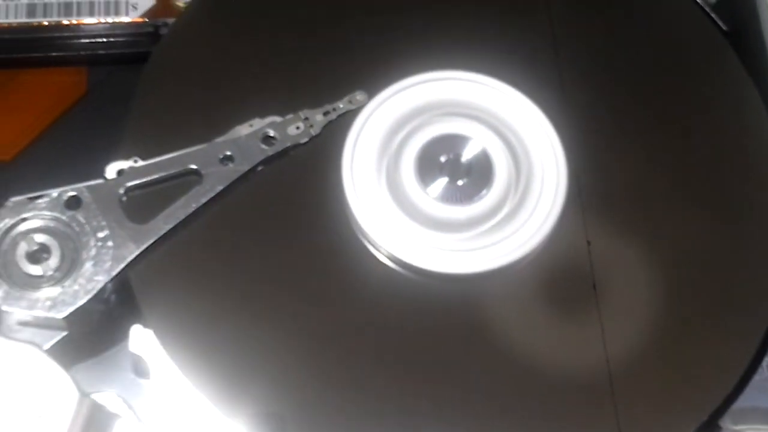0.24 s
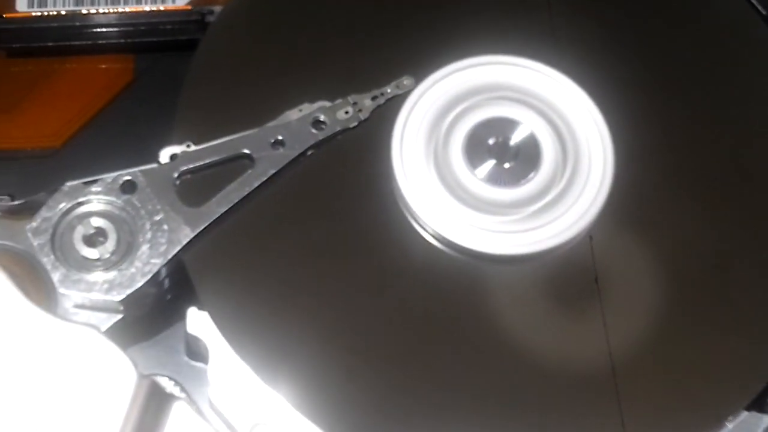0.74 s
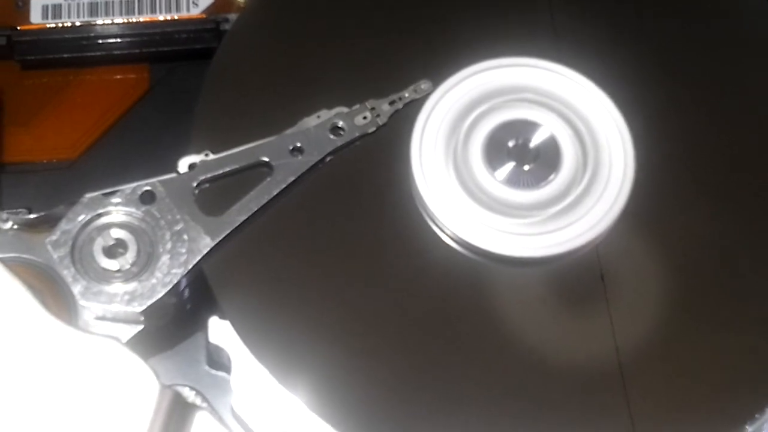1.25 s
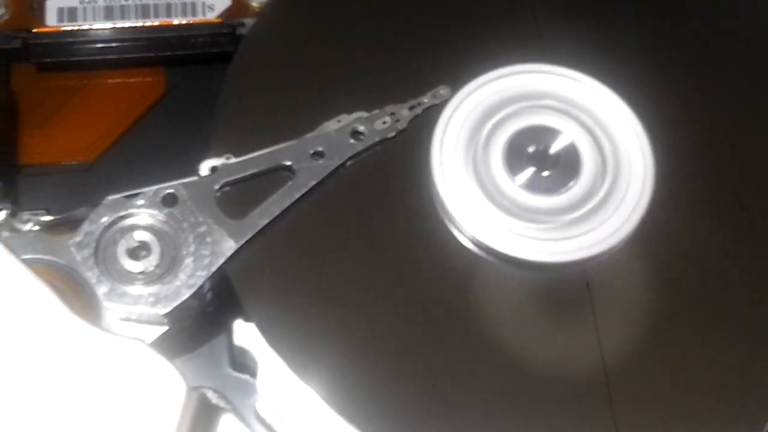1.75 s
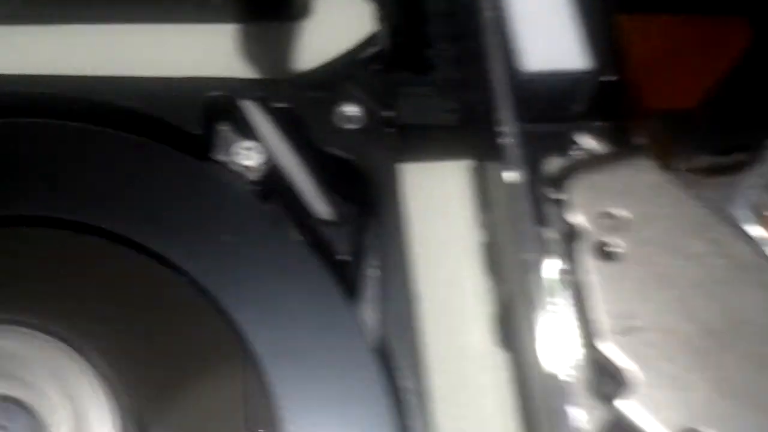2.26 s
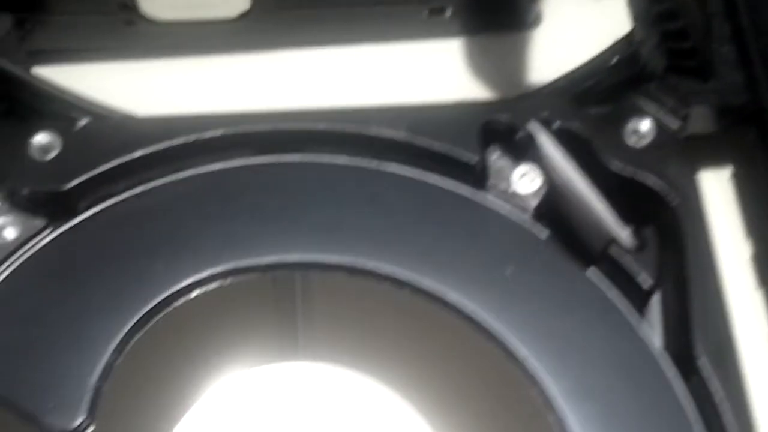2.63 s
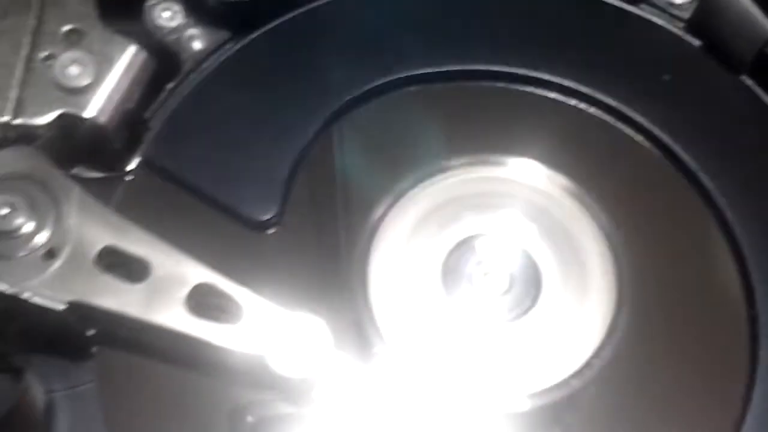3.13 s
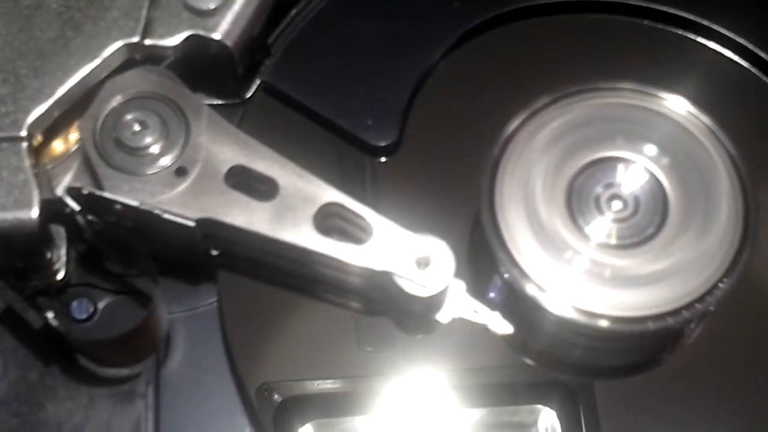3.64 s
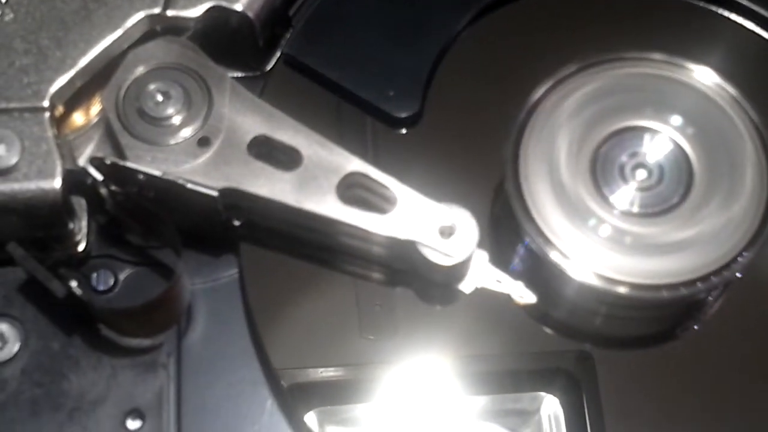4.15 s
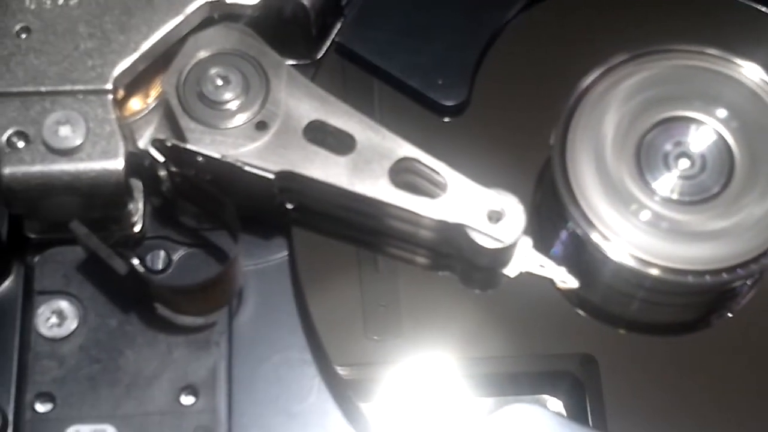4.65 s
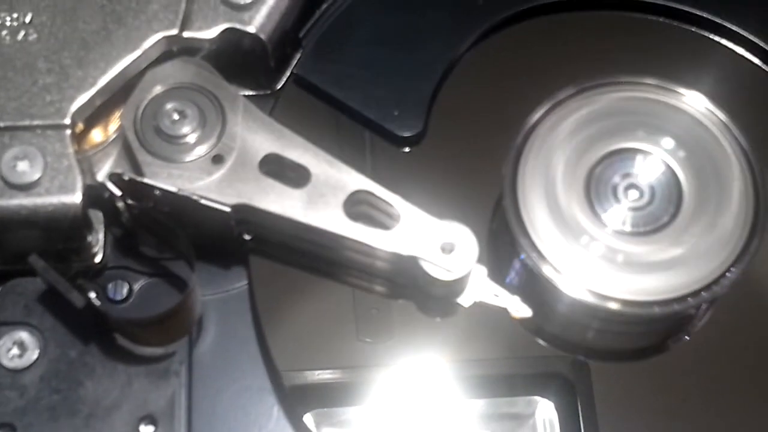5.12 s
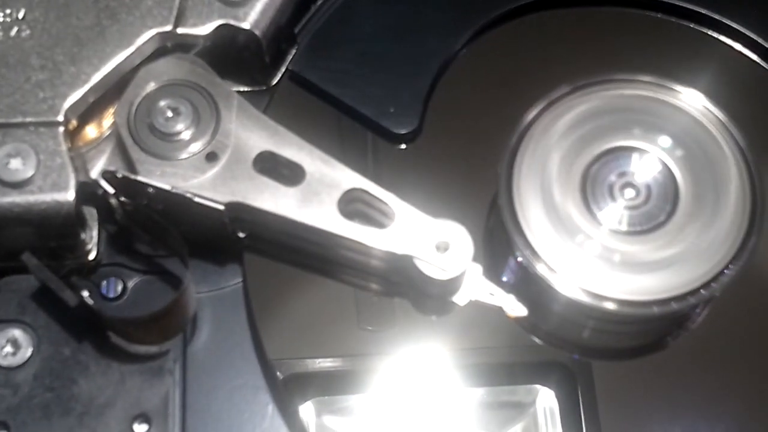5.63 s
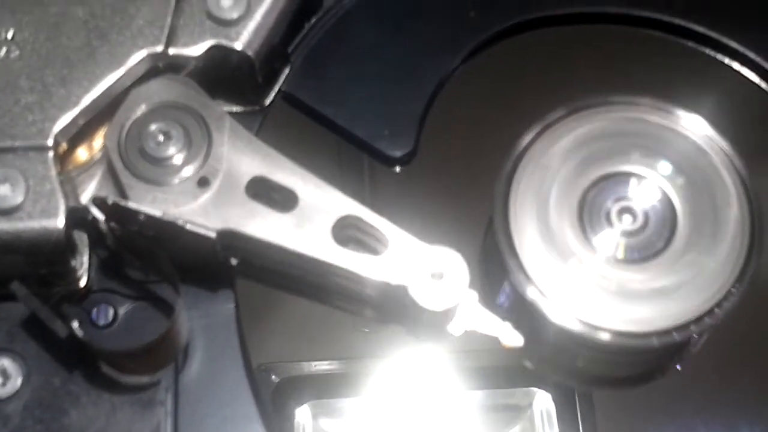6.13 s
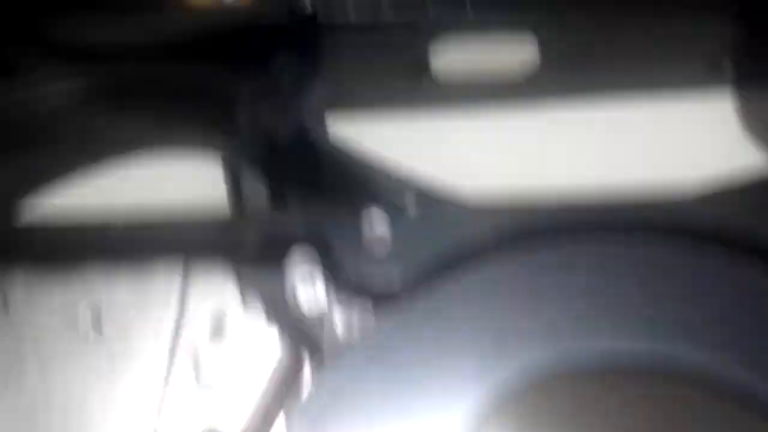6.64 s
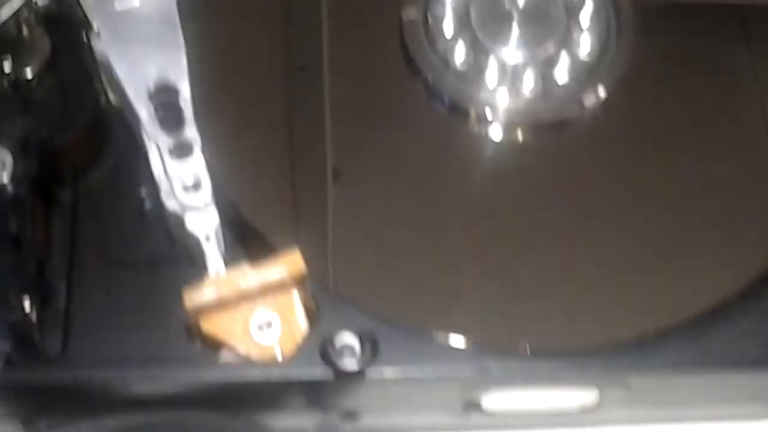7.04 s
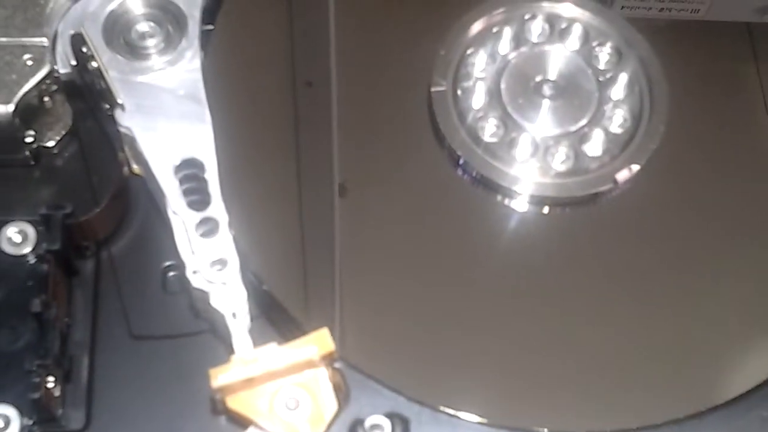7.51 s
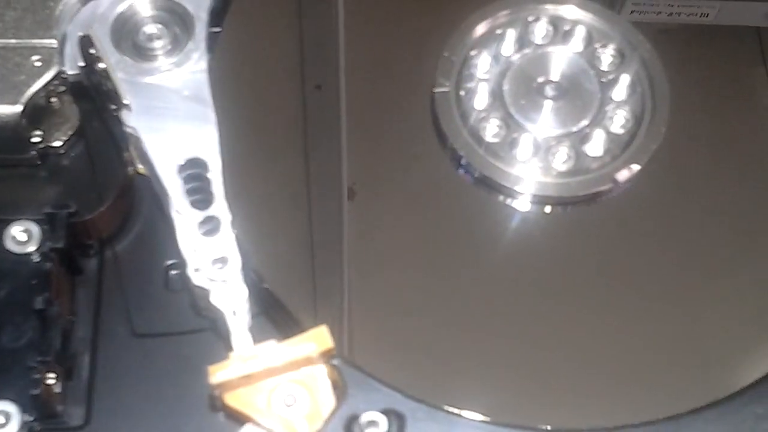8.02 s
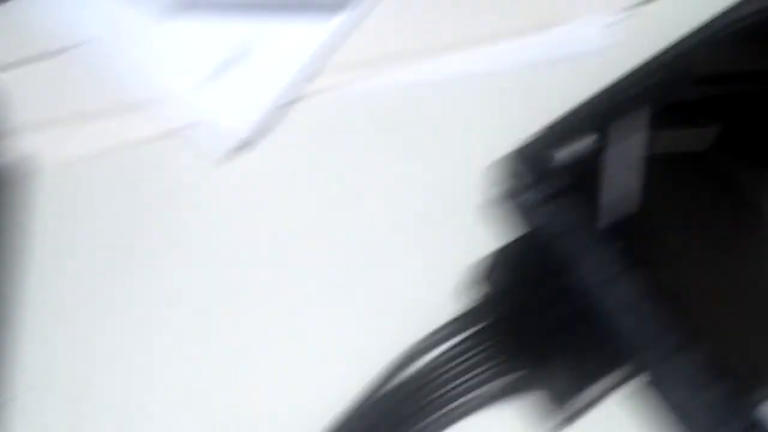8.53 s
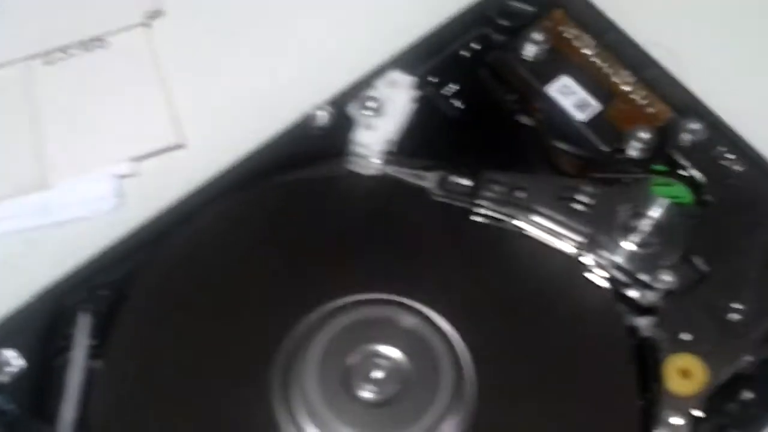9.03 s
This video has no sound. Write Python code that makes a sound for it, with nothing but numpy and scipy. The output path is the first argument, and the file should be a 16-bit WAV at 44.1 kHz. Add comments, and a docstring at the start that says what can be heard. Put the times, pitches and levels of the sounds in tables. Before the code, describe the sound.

Uncovered hard drives whine steadily with rushing air and brief stutters, while head arms clack sharply and a rubbing head hisses thinly, close up indoors.

```python
"""A spindle motor whines close to the microphone, over rushing air and the thin metallic hiss of a rubbing head.
Short cuts in the motor current make the whine stutter; the air is filtered noise dragged round by the platters.
Several failing hard drives run uncovered on a table and the microphone moves among them, changing the balance.
Head arms clack against their stops as struck, ringing modes with a short room tail; one clack lands a second
head, which rubs as resonant noise, squeals and groans. A few soft bumps ring on the table."""
import sys
import numpy as np
from scipy import signal
from scipy.fft import rfft, irfft, next_fast_len
from scipy.io import wavfile
from scipy.ndimage import uniform_filter1d

SR = 44100
rng = np.random.default_rng(int(sys.argv[2]) if len(sys.argv) > 2 else 0)


def wav_out(sig):
    """Save sig, one row per channel (or a flat mono array), as 16-bit PCM at SR to the path in sys.argv[1]."""
    wavfile.write(sys.argv[1], SR, np.round(np.clip(np.atleast_2d(sig).T, -1, 1) * 32767).astype(np.int16))


N = 408807
TIME = np.arange(N) / SR  # s

# Microphone places, whose moves may overlap or run out of order: middle of the move [t/s], length of the move [s],
# then levels there: whine, casing buzz, casing rasp, air, spindle hum [level/dB]
PLACES = {"first drive": (-1, .1, -30.5, -38, -44, -37.6, -82),
          "between drives": (2.5, 1.5, -26.5, -40.5, -40, -34.5, -81),
          "second drive": (3, .35, -31.4, -38.5, -45, -38, -78),
          "beside the second drive": (6.5, 1, -31, -38, -42.5, -36.5, -74),
          "third drive": (7, 0.5, -28.5, -38.8, -49, -34.5, -73),
          "over the table": (6, 3.7, -26, -39.5, -43, -36.5, -75),
          "fourth drive": (8.5, 0.4, -29, -37, -35, -32.5, -93.5)}
# Stutters of the motor current: middle of first cut [t/s], cut-to-cut time [s], cut length [s], cuts [count]
STUTTERS = [(0.199, .057, .029, 2), (1.107, .054, 0.039, 2), (1.36, 0.054, .034, 2),
            (2.073, 0.065, 0.035, 2), (2.608, 0.049, .027, 2), (2.884, 0.051, 0.031, 2),
            (3.187, .067, .034, 2), (3.677, 0.048, 0.031, 2), (3.774, 0.0654, 0.0328, 2),
            (4.088, .053, 0.034, 2), (4.63, .057, 0.033, 2), (4.944, 0.049, 0.035, 2),
            (5.655, 0.05, 0.035, 2), (6.381, 0.039, 0.037, 2), (6.647, 0.056, .029, 2),
            (6.96, 0.049, .033, 2), (7.942, .047, 0.034, 3), (8.382, 0.048, 0.028, 3),
            (8.609, 0.047, 0.034, 3), (8.835, 0.047, 0.036, 2), (9.106, .046, .038, 3)]
# The whine's octave: [t/s], [level/dB]
OCTAVE_LEVEL = [(0.0, -42), (0.5, -39.5), (2.05, -39.1), (2.25, -49.1), (2.8, -41.5), (4.55, -40.5),
                (4.75, -40), (5.2, -41), (6.8, -37), (7.15, -44), (7.75, -41), (8.0, -43), (8.25, -43),
                (9.05, -54.5), (9.25, -47)]
# Drive casing resonances, buzz and rasp: [f/Hz], width [Hz], relative [level/dB]
CASING_BUZZ = [(1586, 160, -6.5), (1680, 50, -9), (1828, 34, 0.5), (2074, 33, -0.5), (2279, 68, 2),
               (3625, 91, -5.5), (3824, 223, 0), (4070, 72, -8.5), (4557, 120, -8.5), (8500, 310, -16.5),
               (9960, 1040, -19.5)]
CASING_RASP = [(2070, 92, -10), (2337, 104, 9), (4100, 170, 0.5), (3770, 220, -9), (4660, 290, -14),
               (5600, 200, -14), (10900, 1100, -18)]
# Further resonances of casings, and of the second drive's rubbing head (13150, 14900 Hz),
# by the drive they are heard near: [f/Hz], width [Hz], [level/dB]
NEAR_RINGS = {"first drive": [(1470, 110, -47.5)], "second drive": [(2330, 24, -50), (6060, 130, -56.5),
              (9830, 600, -60), (11650, 260, -59), (13150, 600, -56), (14900, 890, -57)],
              "third drive": [(3403, 230, -41.5), (11670, 100, -60), (13900, 500, -61)],
              "fourth drive": [(2310, 230, -39), (3970, 290, -38.5), (6600, 1200, -51.5)]}
# Arm against its stop: [t/s], bright tick [level/dB], body knock [level/dB], before the body's bass loss
CLACKS = [(.535, -34.5, -50), (.589, -33.5, -50), (1.1842, -28.5, -20.5), (1.797, -38, -29),
          (1.8498, -33, -52), (1.98, -50, -63), (2.5652, -25, -18), (2.5714, -28, -17), (6.5426, -44, -60),
          (9.1278, -41.5, -50)]
# Struck modes of the arm and of the drive's body: [f/Hz], relative [level/dB], t60 [s]
ARM_MODES = [(3380, 1, 0.013), (3760, 6, .015), (4480, -1.5, 0.016), (5200, -8, 0.015), (6470, -6, 0.007),
             (7820, -1, 0.01), (9040, -3.5, 0.022), (10000, -3, 0.0092), (11100, -4, 0.006),
             (12100, -7, .012), (14000, -18, .01)]
BODY_MODES = [(990, -10, .025), (1240, -14, 0.047), (1647, -1.5, 0.031), (1710, 3.5, 0.042),
              (2470, -4, 0.032), (3385, -2.5, .02), (4060, -9, 0.019), (4630, -11, 0.013)]
# First head on its platter: start [t/s], end [t/s], [level/dB]
FIRST_RUBS = [(-.1, 0.535, -45.5), (1.197, 1.8, -44.5)]
# Resonances of the two rubbing heads: [f/Hz], width [Hz], relative [level/dB]
FIRST_HEAD_RUB = [(7980, 240, -6.5), (8762, 22, 5.5), (9150, 170, -3.5), (9500, 120, -14), (10000, 18, 5),
                  (10400, 60, -8), (12000, 190, -2.5), (12605, 22, 1), (12790, 130, -6), (14700, 260, -4),
                  (15125, 22, -1)]
SECOND_HEAD_RUB = [(7900, 250, -7.5), (8900, 400, -2.5), (12300, 400, -4), (13000, 200, -4.5),
                   (15100, 750, -7)]
# Noise spectra, low to high: [f/Hz], relative [level/dB per Hz]
LOW_RUSH = [(30, -56), (60, -32), (100, -24), (180, -20), (250, -6.5), (380, -5.5), (500, -3.5), (640, 1.5),
            (850, -1), (1250, -1), (1600, 1), (2100, -14.5), (3500, -25)]
PLATTER_RUSH = [(1100, -42), (1550, -6), (1950, -1), (2250, 4.5), (2550, 3), (2780, -0.5), (3000, 4),
                (3400, 2.5), (3750, -1.5), (4150, -1), (4500, -6.5), (4900, -10), (5800, -22), (8000, -40)]
FINE_HISS = [(2000, -38), (3500, -15), (5200, 4.5), (6100, 2.5), (6700, 1.5), (7700, 3), (8600, 1),
             (10500, -1), (11500, 3.5), (12200, -4), (13200, -.5), (14400, 0), (15700, -22)]
# Gently wavering tones of the spindles and their bearings: mean [f/Hz], middle [level/dB]
BEARING_TONES = [(251, -72.5), (306.9, -64), (635, -65), (9722, -73), (11549, -72), (11886, -73),
                 (12244, -74)]
# Soft bumps on the table: [t/s], [f/Hz], [level/dB]
BUMPS = [(1.995, 223, -43), (8.35, 446, -34), (8.356, 179.6, -47)]

# motor: whine under power, and its change in a cut
COIL_HZ, CUT_DEPTH_DB, CUT_RISE_HZ = 1858.3, -14, 42
THIRD_HARMONIC_DB, THIRD_LIFT_DB = -64, 14  # the lift is weighted by nearness to the third drive
# second head: its rub starts strong, settles and slowly fades
LANDING_S = 2.575
SECOND_RUB_DB, RUB_SETTLE_S, RUB_FADE_DB_PER_S = -40.5, 0.2, 1.5
RUB_HISS_DB = -3  # broad hiss of a rubbing head, relative to its ringing
# thin squeal from the landing: rises and swells until it breaks off
SQUEAL_HZ, SQUEAL_RISE_HZ_PER_S, SQUEAL_S = 12230, 1450, 0.41
SQUEAL_DB, SQUEAL_SWELL_DB_PER_S = -59, 13
# groan from the landing: sinks and dies
GROAN_START_HZ, GROAN_END_HZ, GROAN_SINK_S = 318, 205.5, .115
GROAN_DB, GROAN_DECAY_DB_PER_S = -47, 70
GROAN_OCTAVE_DB, GROAN_OCTAVE_DECAY_DB_PER_S = -41, 110
# arms
KNOCK_LAG_S = .0038  # the body answers after the tick
REBOUND_S, REBOUND_DB = .008, -11
RADIATION_HZ = 1100  # a drive's body radiates little below this
# air: low rush and fine hiss, level at mean air and the share of the air's swing they follow
LOW_RUSH_DB, LOW_RUSH_FOLLOWS = -43.5, 0.52
HISS_DB, HISS_FOLLOWS = -48, 0.55
TURNS_HZ = 120  # mean pitch of the spindle hum
# microphone passband
MICROPHONE_LOW_HZ, CUTOFF_HZ = 116, 15750


def from_db(db):
    """Amplitude ratio of a level in dB."""
    return 10 ** (np.asarray(db) / 20)


def rms_one(x):
    """Scale to an rms of 1."""
    return x / np.sqrt(np.mean(x ** 2) + 1e-20)


def noise(gain_at):
    """Noise of rms 1 whose spectral amplitude follows a function of frequency."""
    size = next_fast_len(N)
    hz = np.maximum(np.arange(size // 2 + 1) * SR / size, 1)
    spectrum = rfft(rng.standard_normal(size)) * gain_at(hz)
    return rms_one(irfft(spectrum, size)[:N])


def drift(rate_hz):
    """Random wander of rms 1, mostly slower than the given rate."""
    return noise(lambda hz: 1 / (1 + (hz / rate_hz) ** 2))


def rush(spectrum):
    """Turbulence as noise with a smooth spectrum."""
    points_hz, db = np.transpose(spectrum)
    return noise(lambda hz: from_db(np.interp(np.log(hz), np.log(points_hz), db)))


def resonant(peaks):
    """Random forcing of a set of steep-sided resonances."""
    def gain_at(hz):
        return sum(from_db(db) / (1 + ((hz - centre) / (0.71 * width)) ** 2) for centre, width, db in peaks)
    return noise(gain_at)


def phase_of(hz):
    """Phase in radians, accumulated from a moving pitch."""
    return 2 * np.pi * np.cumsum(hz) / SR


def tone(phase, db):
    """Sine with its rms level in dB."""
    return np.sqrt(2) * from_db(db) * np.sin(phase)


def coasting(edge_s=0.0045):
    """1 while the motor current is cut, 0 under power, with soft edges."""
    cuts = []
    for first_s, spacing_s, length_s, count in STUTTERS:
        cuts += [(first_s + k * spacing_s, length_s) for k in range(round(count))]
    outside_s = np.min([np.abs(TIME - s) - length_s / 2 for s, length_s in cuts], axis=0)
    return .5 - .5 * np.tanh(outside_s / edge_s)


def motor(near, whine_db, buzz_db, rasp_db, flutter_db=0.43, jitter=0.35, octave_jitter=.5, octave_flutter_db=2.5):
    """The switched coils whine and shake the casing; in each cut all of it drops and the whine is sharper."""
    cut = coasting()
    power = 1 - cut * (1 - from_db(CUT_DEPTH_DB))
    sharp = uniform_filter1d(cut, size=1300)  # the pitch has no time to settle between close cuts
    phase = phase_of(COIL_HZ + CUT_RISE_HZ * sharp) + jitter * drift(33)
    whine = tone(phase, whine_db + flutter_db * drift(61))
    octave_db = np.interp(TIME, *np.transpose(OCTAVE_LEVEL))
    octave = tone(2 * phase + octave_jitter * drift(16), octave_db + octave_flutter_db * drift(28))
    third = tone(3 * phase, THIRD_HARMONIC_DB + THIRD_LIFT_DB * near["third drive"])
    casing = from_db(buzz_db) * resonant(CASING_BUZZ) + from_db(rasp_db) * resonant(CASING_RASP)
    rings = 0
    for place, peaks in NEAR_RINGS.items():
        for hz, width, db in peaks:
            rings = rings + near[place] * from_db(db) * resonant([(hz, width, 0)])
    return power * (whine + octave + third + casing + rings)


def platters(air_db, hum_db):
    """Air dragged round by the platters gives three bands of noise; the spindles hum and sing in wavering tones."""
    swing_db = air_db - air_db.mean()
    low = from_db(LOW_RUSH_DB + LOW_RUSH_FOLLOWS * swing_db) * rush(LOW_RUSH)
    middle = from_db(air_db) * reflected(rush(PLATTER_RUSH), depth=0.17)
    hiss_db = HISS_DB + HISS_FOLLOWS * swing_db + .5 * drift(17)
    high = from_db(hiss_db) * reflected(rush(FINE_HISS), depth=0.13)
    hum = tone(phase_of(TURNS_HZ + drift(3.3)), hum_db + 2.3 * drift(6))
    tones = sum(tone(phase_of(hz + 0.82 * drift(3.35)), db + 3.6 * drift(1.4)) for hz, db in BEARING_TONES)
    return low + middle + high + hum + tones


def reflected(x, depth):
    """Five echoes off nearby metal colour a sound, their delays wandering slowly."""
    echoes = 0
    for delay_s in rng.uniform(0.000863, 0.0055, 5):
        echoes = echoes + np.interp(TIME - delay_s - .00002 * drift(.3), TIME, x)
    return rms_one(x + depth * echoes)


def arms():
    """An arm ticks on its stop, knocks the drive's body, which is too small to radiate bass, and bounces once."""
    rebounds = np.add(CLACKS, (REBOUND_S, REBOUND_DB, REBOUND_DB))
    times, tick_db, knock_db = np.vstack([CLACKS, rebounds]).T
    tick = strike(times, tick_db, ARM_MODES, chatter=0.18, chatter_s=0.0028)
    knock = strike(times + KNOCK_LAG_S, knock_db, BODY_MODES, chatter=.05, chatter_s=.003)
    bass_loss = signal.butter(3, RADIATION_HZ, "high", fs=SR, output="sos")
    return signal.sosfilt(bass_loss, tick + knock)


def strike(times, levels_db, modes, chatter, chatter_s):
    """Each contact is a blow and a brief random chatter, drawn afresh for every mode."""
    age = np.arange(2048) / SR
    out = np.zeros(N)
    for hz, db, t60 in modes:
        force = np.zeros(N + len(age))
        for s, level_db in zip(times, levels_db):
            blow = chatter * rng.standard_normal(len(age)) * np.exp(-age / chatter_s)
            blow[0] += 1
            start = round(s * SR)
            force[start:start + len(age)] += from_db(level_db + db) * blow
        out += ring(force[:N], hz, t60)
    return out


def ring(force, hz, t60):
    """A two-pole resonator: a unit click sets a sine of height 1 ringing and dying away."""
    r, w = from_db(-60 / (t60 * SR)), 2 * np.pi * hz / SR
    return signal.lfilter([0, np.sin(w)], [1, -2 * r * np.cos(w), r * r], force + 1e-18)


def heads(rough_db=0.6, groan_rough_db=4.5, groan_attack_s=0.016, landing_attack_s=.006):
    """Heads drag on the platters, their thin suspensions singing; the second lands with a squeal and a groan."""
    age = np.maximum(TIME - LANDING_S, 0)
    landed = np.tanh(age / landing_attack_s)
    first = sum(from_db(db) * ((TIME > start) & (TIME < end)) for start, end, db in FIRST_RUBS)
    second = landed * from_db(SECOND_RUB_DB - RUB_FADE_DB_PER_S * age) / np.sqrt(1 + age / RUB_SETTLE_S)
    rub = first * resonant(FIRST_HEAD_RUB) + second * resonant(SECOND_HEAD_RUB)
    rub = rub + (first + second) * from_db(RUB_HISS_DB) * rush(FINE_HISS)

    rising = np.minimum(age, SQUEAL_S)
    squeal_phase = phase_of(SQUEAL_HZ + SQUEAL_RISE_HZ_PER_S * rising)
    squeal = tone(squeal_phase, SQUEAL_DB + SQUEAL_SWELL_DB_PER_S * rising)
    rub = rub + landed * (age < SQUEAL_S) * squeal * drift(140)  # the fast drift roughens it

    groan_hz = GROAN_END_HZ + (GROAN_START_HZ - GROAN_END_HZ) * np.exp(-age / GROAN_SINK_S)
    phase = phase_of(groan_hz * (1 + 0.0346 * drift(40)))
    groan = tone(phase, GROAN_DB - GROAN_DECAY_DB_PER_S * age)
    groan = groan + tone(2 * phase, GROAN_OCTAVE_DB - GROAN_OCTAVE_DECAY_DB_PER_S * age)
    groan = np.tanh(age / groan_attack_s) * groan * from_db(groan_rough_db * drift(50.3))
    return rub * from_db(rough_db * drift(60)) + groan


def table(t60=0.07):
    """A soft bump swells and rings briefly at one low pitch."""
    out = 0
    for s, hz, db in BUMPS:
        age = np.maximum(TIME - s, 0)
        level = from_db(db - 60 * np.minimum(age / t60, 3))
        out = out + level * np.tanh(age / .003) * np.sin(2 * np.pi * hz * age)
    return out


def room(x, t60=0.34):
    """A short diffuse tail of decaying noise that starts after the first wall."""
    age = np.arange(SR // 2) / SR
    tail = rng.standard_normal(len(age)) * from_db(-60 * age / t60) * (age > .004)
    return signal.fftconvolve(x, tail / np.sqrt(np.sum(tail ** 2)))[:N]


def nearness():
    """Weight of each place at the microphone, summing to 1; overlapping moves can take a weight below 0."""
    moved = [np.clip((TIME - s) / length + .5, 0, 1) for s, length, *_ in PLACES.values()] + [0]
    return {place: moved[k] - moved[k + 1] for k, place in enumerate(PLACES)}


def heard_levels(near):
    """The levels of whine, buzz, rasp, air and hum at the moving microphone, in dB."""
    return sum(np.outer(levels, near[place]) for place, (_, _, *levels) in PLACES.items())


def scene():
    """All the drives, heard from one microphone that moves among them; both channels are alike."""
    near = nearness()
    whine_db, buzz_db, rasp_db, air_db, hum_db = heard_levels(near)
    spinning = motor(near, whine_db, buzz_db, rasp_db) + platters(air_db, hum_db)
    clacks = arms()
    sound = spinning + heads() + table() + clacks + from_db(-7.5) * room(clacks)
    return np.array([sound, sound])


def record(dry):
    """A small microphone without bass; the top is cut steeply."""
    low_cut = signal.butter(2, MICROPHONE_LOW_HZ, "high", fs=SR, output="sos")
    top_cut = signal.ellip(12, .1, 80, CUTOFF_HZ, fs=SR, output="sos")
    return signal.sosfilt(top_cut, signal.sosfilt(low_cut, dry))


dry = scene()
out = record(dry)
wav_out(out)
```